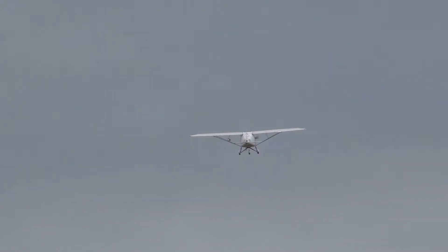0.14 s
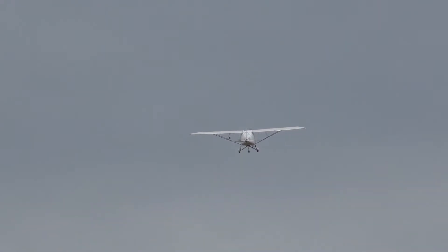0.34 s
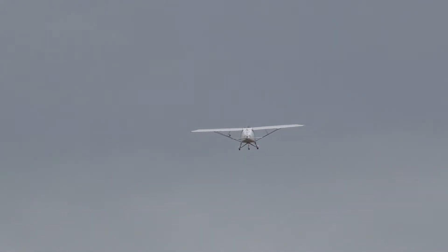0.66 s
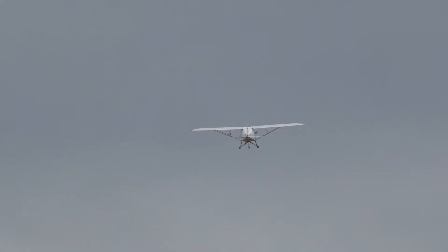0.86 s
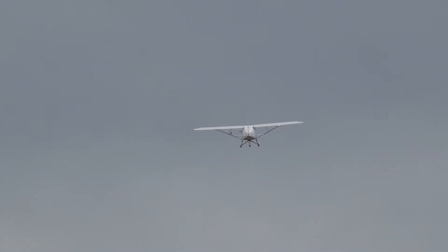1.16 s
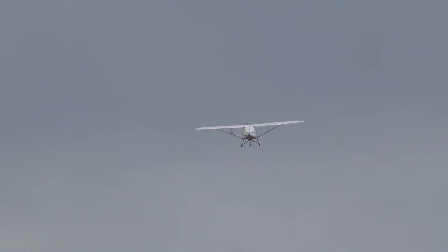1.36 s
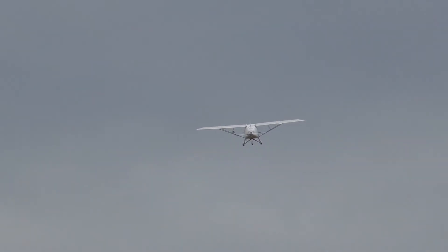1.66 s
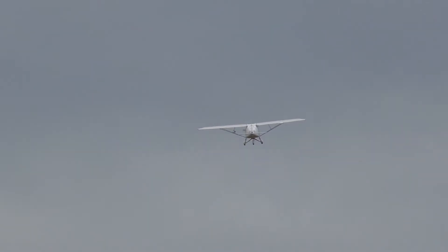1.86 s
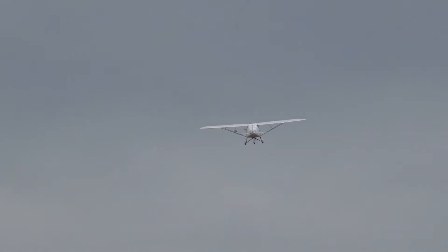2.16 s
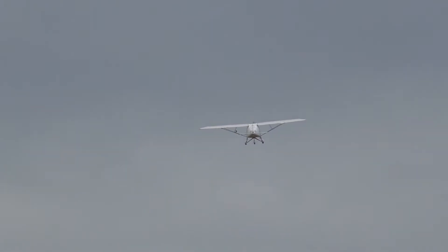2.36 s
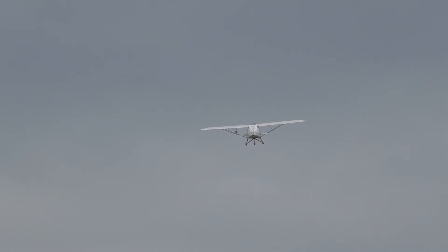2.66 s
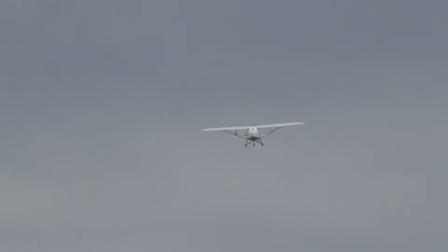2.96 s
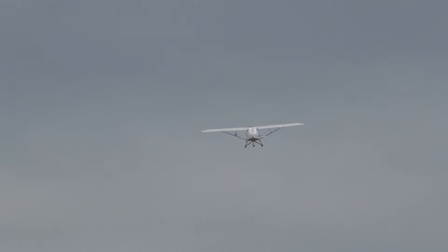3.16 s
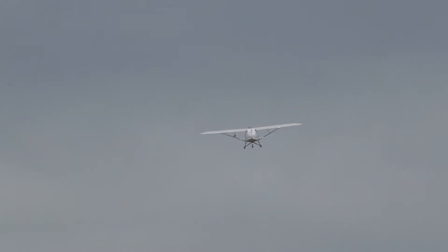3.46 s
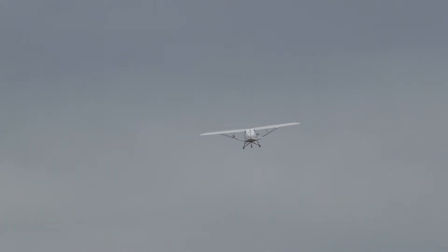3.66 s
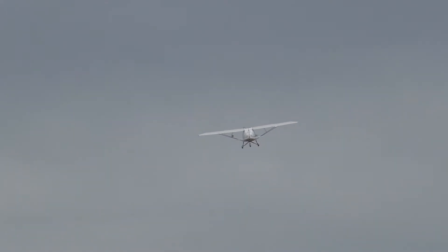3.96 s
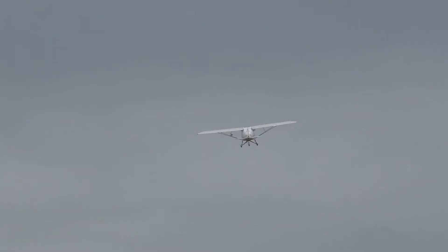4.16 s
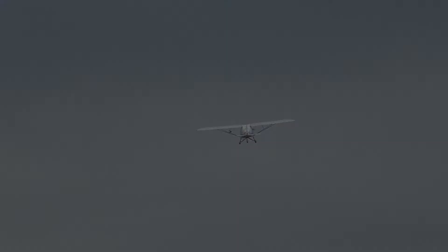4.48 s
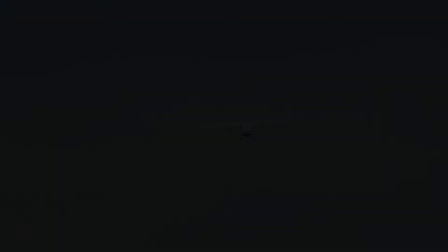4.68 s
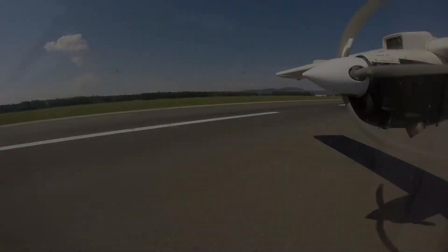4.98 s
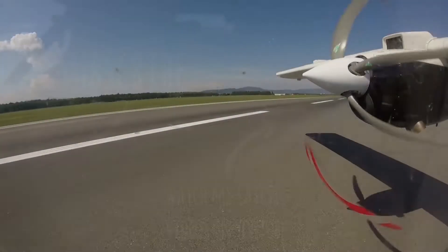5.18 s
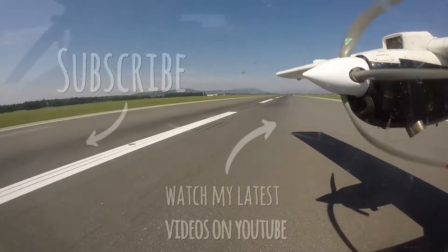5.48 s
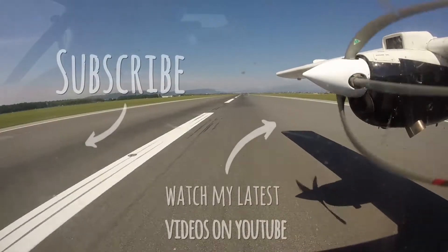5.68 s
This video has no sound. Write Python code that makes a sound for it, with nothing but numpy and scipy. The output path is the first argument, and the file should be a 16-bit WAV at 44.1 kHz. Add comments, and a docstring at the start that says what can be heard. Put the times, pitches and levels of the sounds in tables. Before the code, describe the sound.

A small plane's engine and propeller drone steadily overhead, picked up in stereo from the ground in the open air. Faint wind and brief, thin whistles sit behind the exhaust noise at first. Then the low hum grows fuller and a rough, buzzing rasp comes clear, with a slow downward sweep in its tone. The pitch drops a little as the plane moves off, and the sound fades to silence.

```python
"""A light propeller aircraft climbs past an airfield, heard from the ground. It opens on a roar of exhaust gas,
with brief whistles and a breeze in the grass that soon dies down. Blade and firing tones swell, an uneven burr
comes clear, and a rasp pulses with each firing. Moving air lifts the treble in short swells; the ground echo
lags more and more, a slow downward sweep. As the aircraft turns, three strong puffs a cycle give way to one
throb and the tones sink; then the sound fades to silence."""
import sys
import numpy as np
from scipy import signal
from scipy.fft import rfft, irfft, next_fast_len
from scipy.io import wavfile
from scipy.ndimage import map_coordinates

SR = 44100
rng = np.random.default_rng(int(sys.argv[2]) if len(sys.argv) > 2 else 0)


def generate_wav(signal):
    """Clip the signal to [-1, 1] and save it as 16-bit WAV at the path in sys.argv[1]."""
    frames = np.transpose(np.atleast_2d(signal))
    scaled = np.clip(frames, -1, 1) * 32767
    pcm = np.round(scaled).astype(np.int16)
    wavfile.write(sys.argv[1], SR, pcm)


N = 257103

# Tone colours of the noise layers. Each row: frequency in Hz, relative level in dB.
RUMBLE_COLOUR = [(15, -3.5), (25, -1.5), (50, 1.5), (90, -2), (200, -29.5), (600, -120)]
GRASS_COLOUR = [(2000, -27.5), (6000, 4.5), (9000, 2.5), (13000, 2), (15000, -8)]
HISS_COLOUR = [(1500, -29), (2600, -1.5), (3400, 2.7), (4100, 0), (5000, -3), (6500, -6), (8200, -11),
               (10000, -23), (13000, -33), (15500, -51)]
RASP_COLOUR = [(200, -120), (400, -39.5), (800, 0.5), (1050, -1), (1250, 1.5), (1550, -1), (1950, -1),
               (2500, -4.5), (3300, -17), (5000, -29), (9000, -120)]
BARK_COLOUR = [(150, -120), (300, -33.5), (700, 0.5), (1000, 2), (1400, 3.5), (2000, -19), (3000, -7.5),
               (6000, -40.5), (9000, -120)]
ROAR_COLOUR = [(25, -25), (55, -9.5), (75, -6.5), (200, -1.5), (300, 0.5), (500, 1), (800, -1.5),
               (1000, -5.5), (1500, -31.5), (3000, -73.5), (6000, -120)]
# Level rides for grass, exhaust and hum. Each row: time in seconds, level in dB.
GRASS_RIDE = [(0, -45.5), (.4, -61), (.7, -51), (1.3, -55.5), (1.8, -61.5), (4.2, -70)]
EXHAUST_RIDE = [(0, -28.5), (1.9, -26), (3.1, -26), (3.97, -27), (4.1, -25.5), (4.5, -25), (5.2, -26)]
HUM_RIDE = [(0, -9.5), (.5, -6), (.75, -4.5), (1.05, -2.5), (1.2, -4.5), (1.35, -2), (1.6, -2.5),
            (2.3, -0.3), (3.3, -1)]
# Stereo width of the noise. Each row: frequency in Hz, left-right correlation.
STEREO_LIKENESS = [(30, .4), (80, .24), (300, .98), (800, 0.81), (1600, .68), (2600, .72), (5000, 0.98),
                   (8000, 1), (11000, 1)]
# How the microphone pair hears a source on the right, at a bearing of 1.
# Each row: frequency in Hz, left minus right in dB, left phase lead in radians.
MIC_PAIR = [(200, -4, -0.0089), (450, 1.5, -0.3), (650, -2, -0.54), (1210, -6, -0.73), (1480, -8.5, -0.26),
            (1730, -7.5, 0.66), (2480, -4.5, -0.68), (4500, -2.5, 0.72), (6660, 0, -0.043), (12000, -2, 0)]
# Brief whistles in the roar.
# Each row: peak time and half width in seconds, pitch in Hz, glide in octaves a second, level in dB.
WHISTLE_NOTES = [(.35, .05, 1510, 0, -37), (.395, .032, 520, -1.8, -30), (.55, .025, 460, -1.5, -34),
                 (.76, .03, 2240, 0, -37), (.77, .025, 780, 0, -37), (.82, .04, 610, 2.2, -32),
                 (1.88, .03, 2040, .2, -36.5)]
# Treble swells on moving air. Each row: peak time and half width in seconds, hiss lift in dB.
AIR_SWELLS = [(.42, 0.098, 4.5), (.7, 0.13, 3), (1.2, 0.18, 2), (1.6, 0.066, 5), (1.92, 0.11, 3.5),
              (2.26, 0.11, 3.5), (2.76, 0.1, 4.5), (3.4, 0.21, 6), (3.68, 0.04, 10.5), (3.94, 0.09, 5),
              (4.24, 0.084, 6), (4.58, 0.062, 6), (4.84, 0.026, 6.5), (4.94, 0.02, 2.5), (5.08, 0.11, 5)]
# Bands that bloom or thin out for a moment.
# Each row: peak time and half width in seconds, centre and half width in Hz, lift in dB.
BAND_BLOOMS = [(.38, .1, 3950, 350, 3.5), (.55, .05, 3050, 150, 6.5), (.72, .08, 2070, 300, 2.5),
               (1.22, .09, 4050, 320, 5.5), (1.3, .18, 1100, 270, 3.5), (1.78, .1, 1480, 150, -6.5),
               (1.85, .15, 5400, 500, 2.5), (2.05, .35, 714, 190, 1.5), (2.74, .08, 2750, 400, 3),
               (4.12, .07, 369, 60, 1.5), (4.4, .04, 2500, 400, -3), (4.7, .35, 553, 55, -4.5),
               (3.3, .35, 1200, 120, 2), (4.6, .4, 1750, 200, 2)]
# The ground echo of the climbing aircraft.
# Each row: time in seconds, lag in ms, strength from 0 to 1, lag in wave cycles at which it blurs.
GROUND_ECHO = [(0, .4, .08, 6), (1.15, .43, .08, 6), (1.55, .54, .13, 8), (1.9, .69, .31, 8),
               (2.4, .92, .26, 8), (2.75, 1.02, .17, 6), (3.1, 1.28, .28, 6), (3.4, 1.42, .24, 6),
               (3.85, 1.71, .2, 5), (4.15, 1.95, .48, 3), (4.4, 2.17, .7, 2.6), (4.6, 2.43, .8, 2.6),
               (5.2, 2.6, .7, 2.6)]
# Engine speed, Doppler shift included. Each row: time in seconds, four-stroke cycles a second.
CYCLE_RATE = [(0, 22.2), (.8, 22.15), (1.5, 21.97), (2, 21.99), (2.8, 21.93), (3.6, 21.83), (4.3, 21.71),
              (4.9, 21.46), (5.3, 21.36)]
# Tones of the unequal cylinders. Each row: multiple of the cycle rate, relative level in dB.
BURR_ORDERS = [(3, -8), (5, -5), (7, -6), (9, 4), (10, -7), (11, 0), (13, 7), (14, 9), (15, 12), (16, 8),
               (17, 2), (18, 7.5), (19, 2), (20, -1), (21, 0), (22, 2), (23, 4), (24, 7), (25, -1), (26, 3),
               (27, 1), (28, 1), (29, 2), (30, 3), (31, 3), (32, 3.5), (33, -1), (35, 2), (36, 0), (37, -1),
               (38, 0), (39, 3)]
# The six exhaust puffs. Each row: place in the cycle from 0 to 1,
# early and late weight in dB (these set the phases of the engine tones), size of the gas burst in dB.
PUFFS = [(.04, -7, -9, -2), (.19, -1, 2, -4.5), (.367, -10, -10, -4), (.52, -3, -4, .5),
         (.69, -9, -10, -3.5), (.865, 1, -6, -1.5)]


def amp(db):
    """Decibels to gain."""
    return 10 ** (np.asarray(db) / 20)


def unit(x):
    """Scale to an rms of 1."""
    return x / np.sqrt(np.mean(x ** 2) + 1e-20)


def seconds():
    """The time of each sample."""
    return np.arange(N) / SR


def bell(offset, width):
    """A Gaussian swell that peaks at 1."""
    return np.exp(-.5 * (offset / width) ** 2)


def settle(start, end, time_s):
    """An exponential glide from start to end."""
    return end + (start - end) * np.exp(-seconds() / time_s)


def along(points, hz):
    """Read (Hz, value) points on a log frequency axis."""
    knots_hz, values = np.transpose(points)
    return np.interp(np.log(hz + 1), np.log(knots_hz + 1), values)


def curves(rows):
    """One automation curve for each column after the time."""
    times, *columns = np.transpose(rows)
    return [np.interp(seconds(), times, column) for column in columns]


def wobble(rate):
    """A smooth random curve, rate knots a second."""
    knots = np.arange(0, N + 64, 64) * rate / SR
    coarse = map_coordinates(rng.standard_normal(2048), [knots], mode="wrap")
    return (coarse[:-1, None] + np.diff(coarse)[:, None] * np.arange(64) / 64).ravel()[:N]


def filtered(x, response):
    """Equalise x with a gain that is a function of frequency."""
    size = next_fast_len(N + SR // 4)
    return irfft(rfft(x, size) * response(np.fft.rfftfreq(size, 1 / SR)), size)[..., :N]


def spread(pair, colour):
    """Colour two unrelated signals and mix them to stereo; the mid has an rms of 1."""
    def mid_side(hz):
        angle = np.arccos(np.clip(along(STEREO_LIKENESS, hz), -1, 1)) / 2
        return amp(along(colour, hz)) * [np.cos(angle), np.sin(angle)]
    mid, side = filtered(pair, mid_side)
    return np.array([mid + side, mid - side]) / np.std(mid)


def breeze():
    """A light wind, dying down, rumbles on each microphone and hisses in the grass."""
    rumble = unit(filtered(rng.standard_normal((2, N)), lambda hz: amp(along(RUMBLE_COLOUR, hz))))
    rumble_db = -54.5 - 4.5 * seconds() + 1.5 * wobble(5.9)
    grass = spread(rng.standard_normal((2, N)), GRASS_COLOUR)
    return amp(rumble_db) * rumble + amp(curves(GRASS_RIDE)[0]) * grass


def whistles():
    """Short, slightly unsteady tones that swell and glide inside the roar."""
    out = np.zeros(N)
    for peak_s, width, hz, glide, db in WHISTLE_NOTES:
        since = np.clip(seconds() - peak_s, -5 * width, 5 * width)
        phase = 2 * np.pi * np.cumsum(hz * 2 ** (glide * since)) / SR + .5 * wobble(60)
        out += np.sqrt(2) * amp(db) * bell(since, width) * np.sin(phase)
    return out


def air_swells():
    """The lift in dB that moving air gives the treble."""
    t = seconds()[::64]
    return np.interp(seconds(), t, sum(db * bell(t - s, width) for s, width, db in AIR_SWELLS))


def eddies(hz, t, depth_db, rate, per_octave):
    """Moving air lifts and sinks patches of the spectrum above the hum."""
    octave = np.log2(1 + hz / 400)
    grid = np.broadcast_arrays(per_octave * octave, rate * t)
    patches = map_coordinates(rng.standard_normal((64, 128)), grid, mode="wrap")
    return amp(depth_db * np.minimum(octave, 1) * patches)


def whoosh(hz, t, start_hz=1060, climb_hz_per_s=1550, lift_db=3.5, until_s=.88):
    """A narrow boost sweeps up through the opening rasp; other bands bloom or thin out briefly."""
    sweep_db = lift_db * bell(hz - start_hz - climb_hz_per_s * t, 150) / (1 + (t / until_s) ** 20)
    bloom_db = sum(db * bell(hz - centre, span) * bell(t - s, width)
                   for s, width, centre, span, db in BAND_BLOOMS)
    return amp(sweep_db + bloom_db)


def ground_echo(hz, lag_ms, strength, blur_cycles, flip_hz=534):
    """Direct sound plus its bounce off the grass: bass upright, treble inverted, blurred when late."""
    late_cycles = hz * lag_ms / 1000
    mirror = strength / (1 + (late_cycles / blur_cycles) ** 4)
    bounce = mirror * (flip_hz - 1j * hz) / (flip_hz + 1j * hz)
    return (1 + bounce * np.exp(-2j * np.pi * late_cycles)) / np.sqrt(1 + np.abs(bounce) ** 2)


def microphones(hz, bearing):
    """The pair turns bearing (negative left, positive right) into level and phase differences."""
    table = np.array(MIC_PAIR)
    level_db, lead = along(table[:, :2], hz), along(table[:, ::2], hz)
    half = bearing * (np.log(amp(level_db)) + 1j * lead) / 2
    return np.exp([half, -half]) / np.abs(np.cosh(half))


def travel(x, bright_hz=4700):
    """The path to the listener: beaming, moving air, the ground and the microphone pair."""
    hz, t, spectrum = signal.stft(x, SR, nperseg=1024, noverlap=768)
    hz = hz[:, None]
    path = settle(-2.3, 1.47, time_s=.78), *curves(GROUND_ECHO)
    bearing, lag_ms, strength, blur = [np.interp(t, seconds(), curve) for curve in path]
    shelf_db = -3.5 + .41 * t ** 2  # the top opens ever faster as the aircraft turns
    beam = amp(shelf_db * np.clip(np.log2((hz + 1) / bright_hz), 0, 1))
    air = eddies(hz, t, depth_db=1.1, rate=6, per_octave=7.14) * whoosh(hz, t)
    heard = spectrum * beam * air * ground_echo(hz, lag_ms, strength, blur) * microphones(hz, bearing)
    return signal.istft(heard, SR, nperseg=1024, noverlap=768)[1][:, :N]


def gas_flow(cycle, width, floor):
    """One short surge of gas per cylinder on a steady floor; width is a share of the cycle."""
    turn = np.linspace(0, 1, 512)
    surges = sum(amp(db) * bell((turn - place + .5) % 1 - .5, width) for place, _, _, db in PUFFS)
    return floor + np.interp(cycle % 1, turn, surges)


def bark(cycle, scatter_s, scatter_db, ring_s=.03):
    """The sharp front of each puff, a little different every time and smeared by the pipe."""
    fronts = np.zeros((2, N))
    turns = np.arange(int(cycle[-1]))
    for place, _, _, db in PUFFS:
        chance = rng.standard_normal((160, 3))[:len(turns)]
        at = np.interp(turns + place, cycle, np.arange(N)) + scatter_s * SR * chance[:, 0]
        fronts[:, np.clip(at.astype(int), 0, N - 1)] += amp(db - scatter_db * chance[:, 1:].T)
    t = np.arange(SR // 50) / SR
    pipe = rng.standard_normal((2, len(t))) * amp(-60 * t / ring_s)
    return spread(signal.fftconvolve(fronts, pipe, axes=1)[:, :N], BARK_COLOUR)


def chopping(cycle):
    """The pulse of the rasp: firings chop the gas and each blade passage fans it."""
    blade_wash = 1 + .065 * np.cos(8 * np.pi * (cycle - .04))
    return gas_flow(cycle, width=.021, floor=2) * blade_wash * amp(.26 * wobble(140))


def rasp(cycle, chop):
    """Turbulent gas and blade wash, chopped by the firings, swelling and fluttering in the air."""
    t, swell_db, flutter = seconds(), air_swells(), wobble(25)
    body_db = -29 - 1.5 * t + .45 * swell_db + .08 * flutter
    hiss_db = -38 - .36 * t + swell_db + .98 * flutter
    gas = spread(chop * rng.standard_normal((2, N)), RASP_COLOUR)
    body = gas + amp(-4) * bark(cycle, scatter_s=.00008, scatter_db=1)
    grain = amp(.9 * wobble(330))  # roughens the hiss
    hiss = spread(chop * grain * rng.standard_normal((2, N)), HISS_COLOUR)
    return amp(body_db) * body + amp(hiss_db) * hiss


def puff_phase(order, smear=.0033, throb_s=3.2, morph_s=.8):
    """The phase six puffs give an order: each is a pressure dip then a push, smeared by the pipe."""
    place, early_db, late_db, _ = np.transpose(PUFFS)
    t = np.linspace(0, N / SR, 64)
    throb = .5 + .5 * np.tanh((t[:, None] - throb_s) / morph_s)  # three strong puffs morph into one
    puffs = amp(early_db + throb * (late_db - early_db)) @ np.exp(-2j * np.pi * order * place)
    return np.interp(seconds(), t, np.unwrap(np.angle(-1j * puffs))) - smear * order ** 2


def engine_tone(cycle, order, offset, waver_db, drift):
    """A wavering tone at a multiple of the cycle rate; offset and drift are in radians."""
    phase = 2 * np.pi * order * cycle + offset + drift * wobble(6)
    return np.sqrt(2) * (1 + (amp(waver_db) - 1) * wobble(7)) * np.cos(phase)


def exhaust(cycle):
    """The burr of unequal cylinders comes clear of a gas roar that surges just after each puff."""
    burr = unit(sum(amp(db) * engine_tone(cycle, k, puff_phase(k), waver_db=.7, drift=.0003 * k ** 2)
                    for k, db in BURR_ORDERS))
    flow = gas_flow(cycle - .01, width=.041, floor=2.6)
    roar = spread(flow * rng.standard_normal((2, N)), ROAR_COLOUR)
    burr_gain = amp(settle(-18.5, 2.5, time_s=.85))
    level_db = curves(EXHAUST_RIDE)[0] + .08 * air_swells()
    return amp(level_db) * (burr_gain * burr + roar) / np.hypot(1, burr_gain)


def singing(cycle, order=35, level_db=-42, entry_s=4.25, rise_s=.12):
    """One high engine order sings out near the end."""
    entry = .5 + .5 * np.tanh((seconds() - entry_s) / rise_s)
    return amp(level_db) * entry * engine_tone(cycle, order, puff_phase(order), waver_db=1.5, drift=.15)


def hum(cycle, fall_s=3.36, octaves_s=4.02, blade_place=.155):
    """Four blade passages and six firings a cycle: two tones and their octaves on one arch of level."""
    t = seconds()
    arch_db = curves(HUM_RIDE)[0] - 3 * np.maximum(t - fall_s, 0) ** 2
    turn_db = .32 * (t - fall_s)  # the blades gain on the firings as the aircraft turns
    octave_db = 15 * np.maximum(t - octaves_s, 0)  # both octaves push forward near the end
    flutter_db = settle(3.5, .4, time_s=.55)
    beat_db = settle(4, 0, time_s=.8) * np.cos(2 * np.pi * 9.8 * t)
    blade, blade_octave = [  # each passing blade is a dip in pressure
        -engine_tone(cycle, k, -2 * np.pi * k * blade_place, waver_db=.3, drift=.05) for k in (4, 8)]
    firing, firing_octave = [
        engine_tone(cycle, k, puff_phase(k), waver_db=.4, drift=.06) * amp(flutter_db * wobble(19))
        for k in (6, 12)]
    propeller = amp(-25.5 + turn_db + beat_db) * (blade + amp(-14.5 + octave_db) * blade_octave)
    low = propeller + amp(-25.5 - .63 * turn_db) * firing
    high = amp(-27 + octave_db) * firing_octave
    low_pan, high_pan = amp([[-1.9], [1.6]]), amp([[-.3], [.3]])
    return amp(arch_db) * (low * low_pan + high * high_pan)


def scene():
    """One shaft drives the tones, exhaust and rasp; whistles and breeze sit behind them."""
    cycle = np.cumsum(curves(CYCLE_RATE)[0]) / SR
    gas_cycle = cycle - .045  # the rasp trails each puff
    chop = chopping(gas_cycle)
    tones = hum(cycle) + singing(cycle)
    return tones + travel(exhaust(cycle) + rasp(gas_cycle, chop)) + whistles() + breeze()


def record(dry, top_hz=15500):
    """Open at once, fade to silence and cut the very top."""
    fade = np.interp(seconds(), [0, .004, 4.4, 5.25], [0, 1, 1, 0]) ** 1.2
    return filtered(dry * fade, lambda hz: hz < top_hz)


dry = scene()
out = record(dry)
generate_wav(out)
```